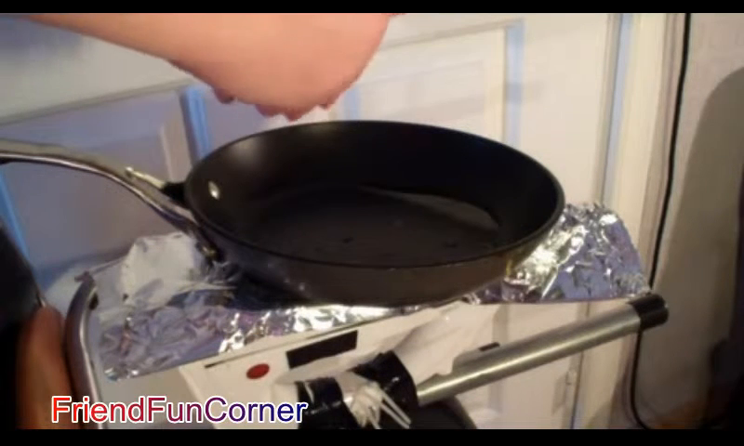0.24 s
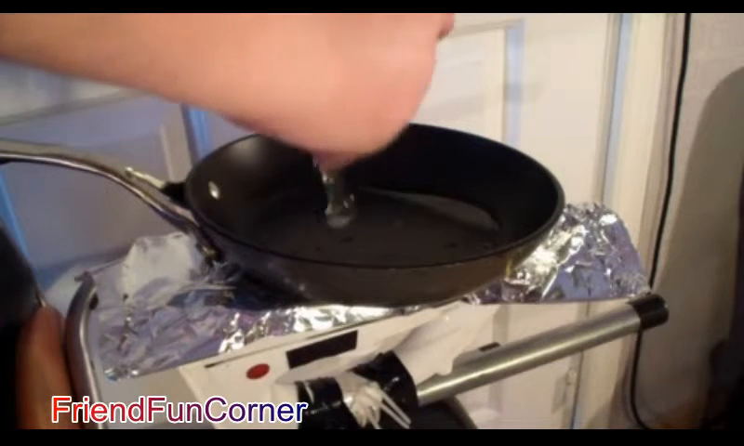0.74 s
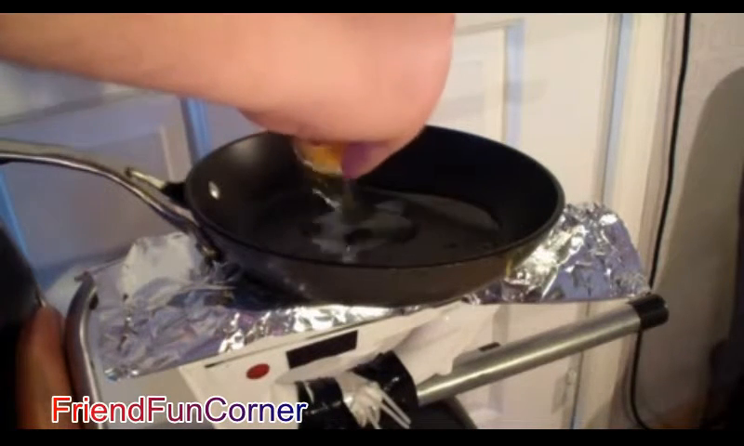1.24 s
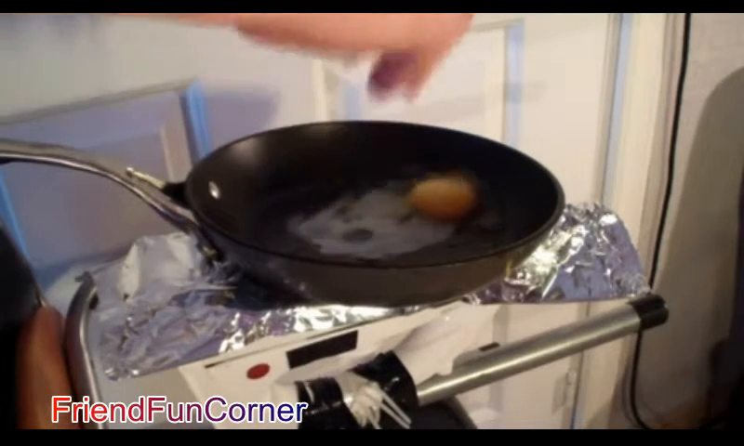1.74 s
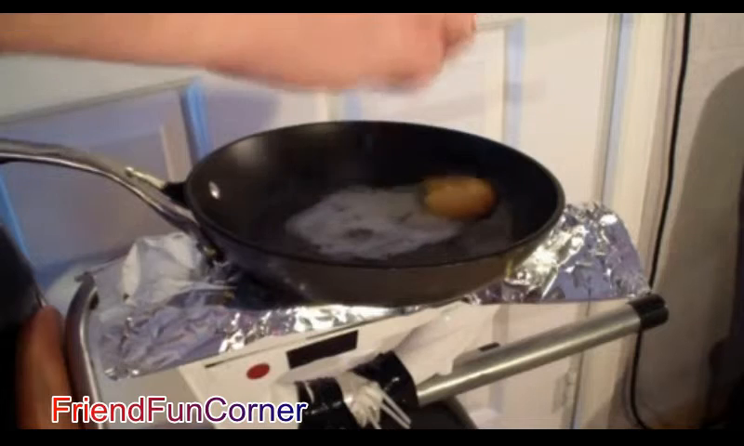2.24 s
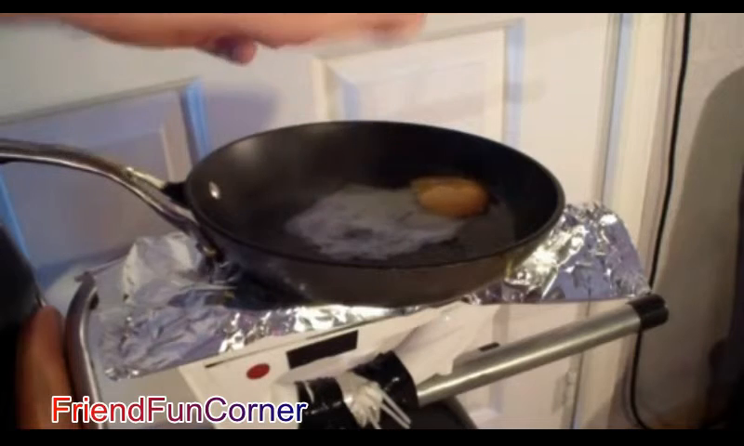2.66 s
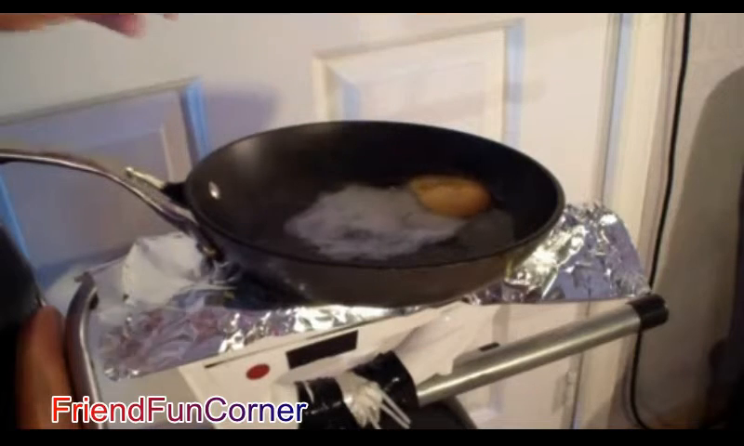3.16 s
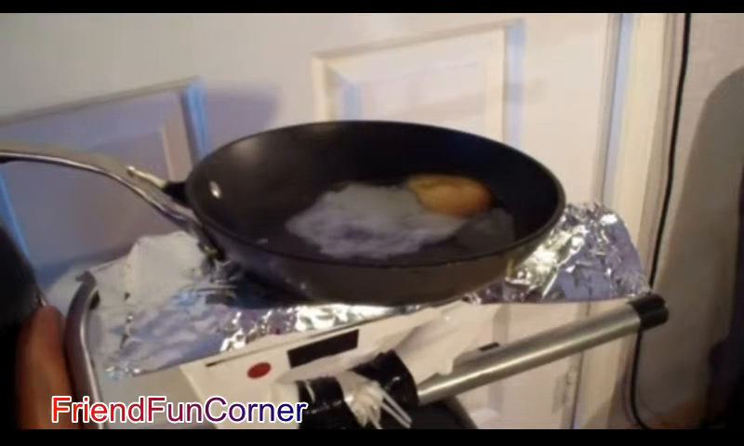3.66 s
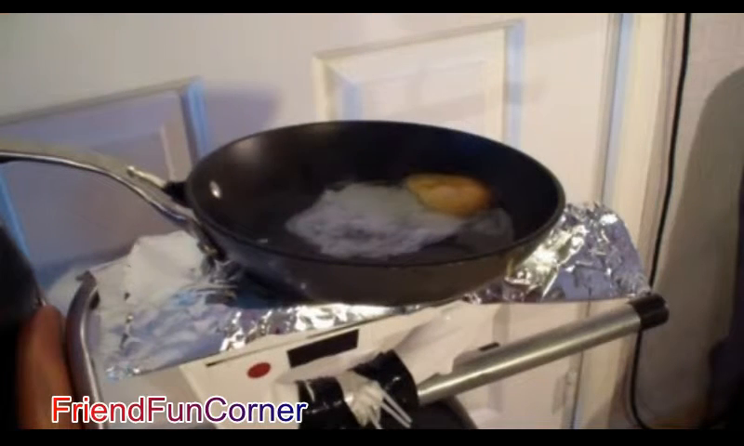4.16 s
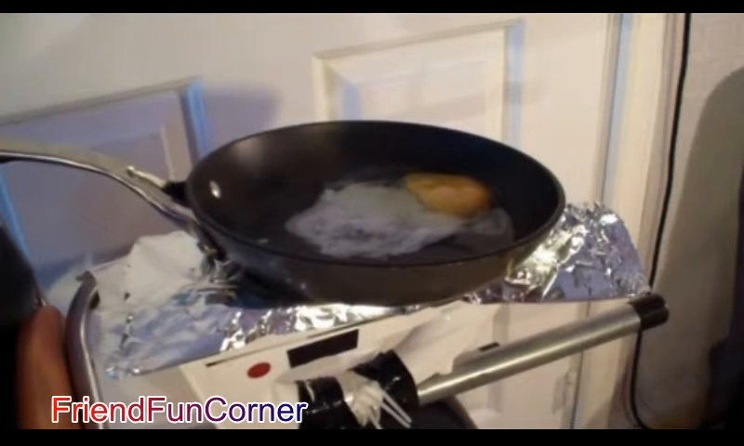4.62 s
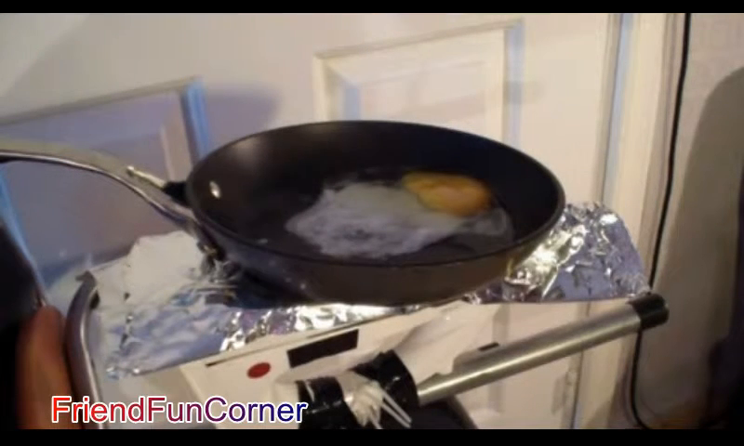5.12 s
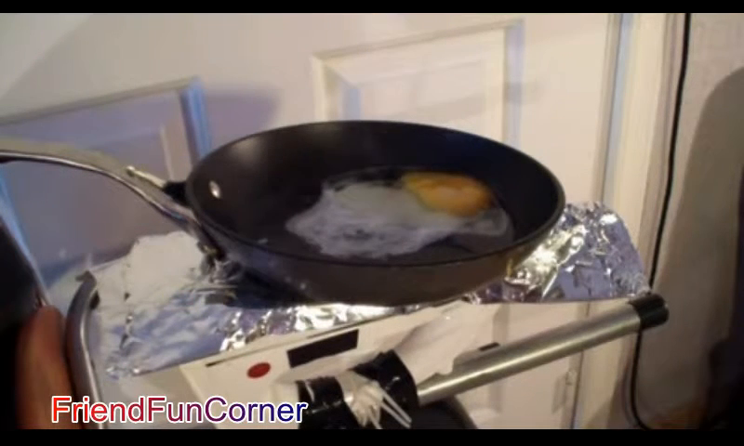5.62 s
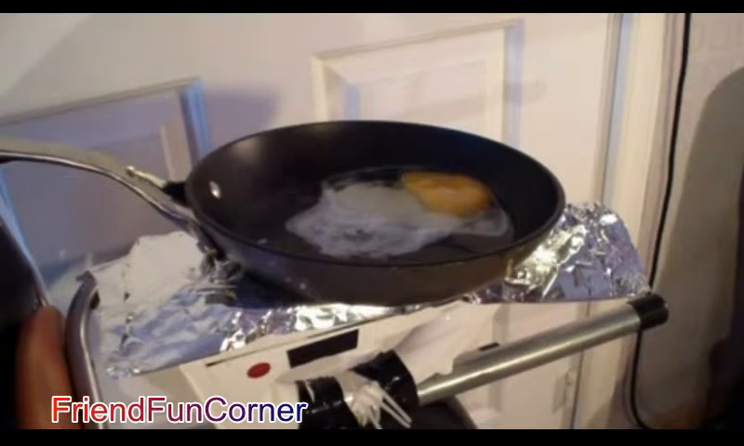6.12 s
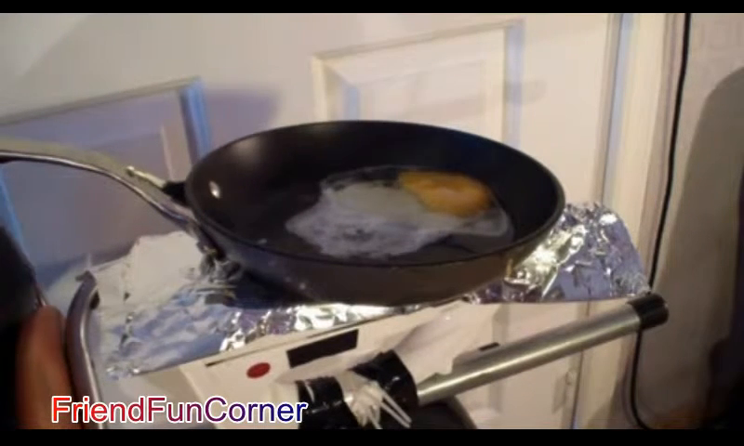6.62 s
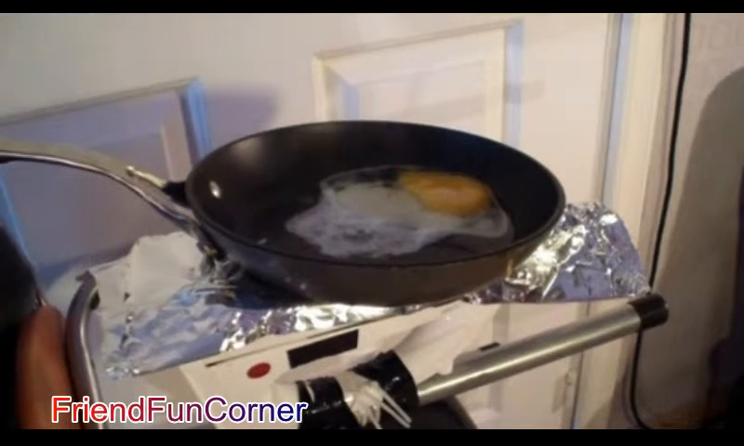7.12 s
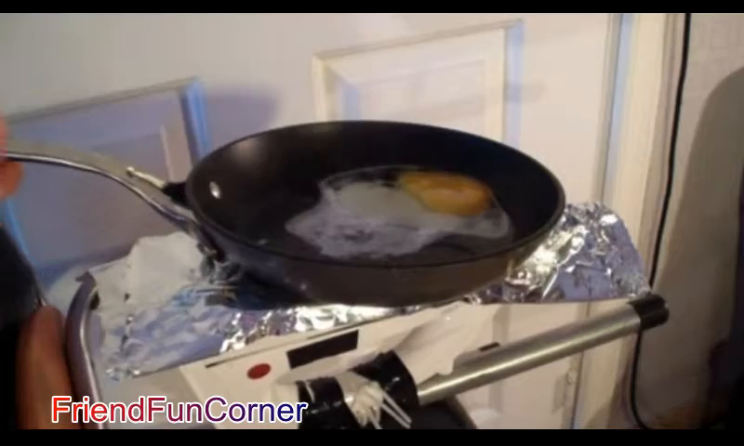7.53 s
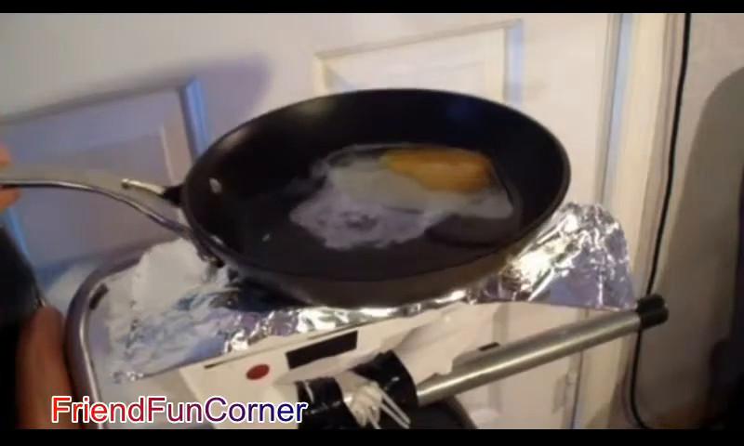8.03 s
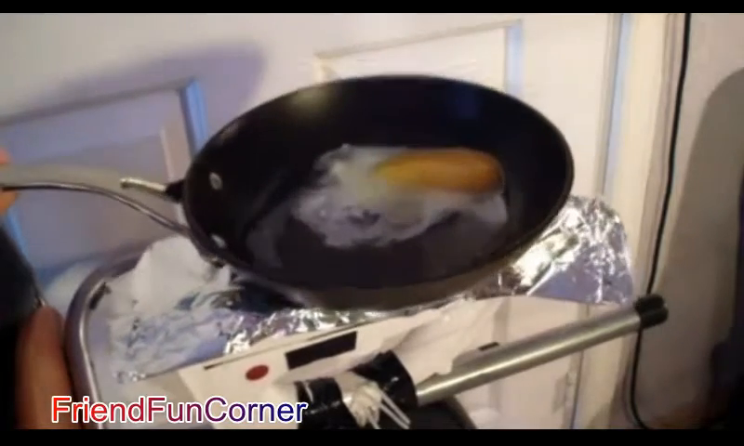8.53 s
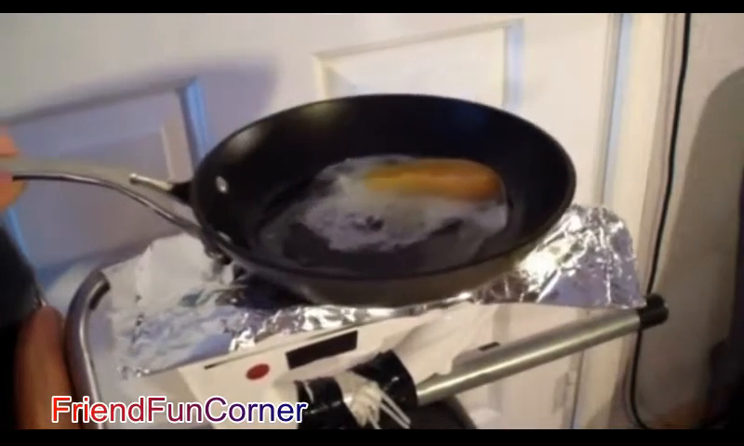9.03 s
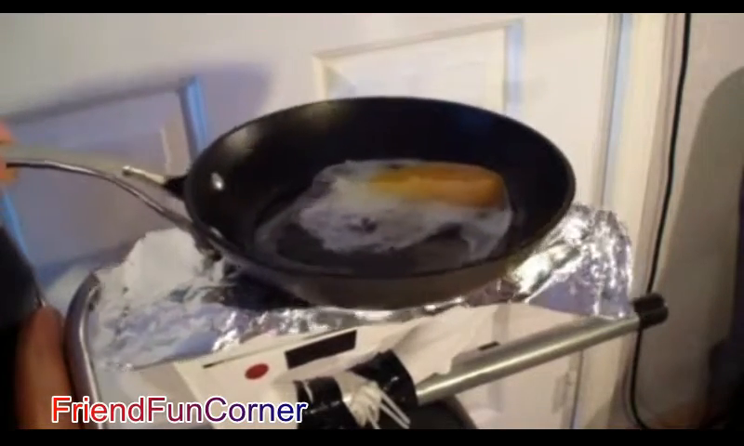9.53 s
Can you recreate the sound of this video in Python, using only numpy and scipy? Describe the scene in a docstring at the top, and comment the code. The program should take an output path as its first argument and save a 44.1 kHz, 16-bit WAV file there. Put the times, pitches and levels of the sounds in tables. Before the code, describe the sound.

Crunchy egg crack, wet plops and a short crackling sizzle that calms, followed by a light tap, a bumped sliding drawer and rustling foil.

```python
"""Frying an egg, close up in a kitchen

Close to the microphone an egg shell cracks (noise bursts and short modes); the egg bubbles and spits in a hot pan
(damped sines and bursts over a noise fizz), then calms. A cup is tapped (short tones); something like a drawer
is bumped, clicks twice and slides (resonant noise); the pan is tilted over crinkling foil (clumped noise).
A fan-like hiss with thin whines stays beneath; outside an engine idles and pulls away, then another (low tones).
"""
import sys
import numpy as np
from scipy import signal
from scipy.fft import rfft, irfft, next_fast_len
from scipy.io import wavfile
from scipy.ndimage import map_coordinates

SR = 44100
rng = np.random.default_rng(int(sys.argv[2]) if len(sys.argv) > 2 else 0)


def inscribe(sig):
    """Save sig as 16-bit PCM at rate SR to the path in sys.argv[1].

    A 1-D sig is mono; a 2-D sig holds one channel per row.
    Samples are clipped to [-1, 1] before scaling.
    """
    pcm = np.round(np.clip(np.atleast_2d(sig).T, -1, 1) * 32767)
    wavfile.write(sys.argv[1], SR, pcm.astype(np.int16))


N = 430857

# course of the frying: (time [s], relative bubbling level [dB], relative fizz level [dB])
FRYING_COURSE = [(1.1, -69, -74), (1.25, -67, -56.5), (1.35, -56, -56), (1.5, -40, -52), (1.65, -34.5, -54),
                 (1.87, -29.5, -49.5), (2.2, -37, -53.5), (2.7, -41.5, -57), (3.03, -46, -58),
                 (3.75, -50, -60), (3.9, -56, -65), (4.6, -76, -63.5)]
# spectrum of foil, click snaps and tap noise: (frequency [Hz], relative density [dB])
RUSTLE_SPECTRUM = [(240, -34), (400, -1.5), (562, -12), (865, 1), (1330, -1), (1560, 2.5), (1760, -2),
                   (2930, 4.5), (4310, -3.5), (5270, 1.5), (6240, -6), (7510, 2.5), (8370, -6),
                   (13500, -11), (16000, -23)]


def amp(db):
    """Gain of a level in dB."""
    return 10 ** (np.asarray(db) / 20)


def unit(x):
    """x at rms 1."""
    return x / np.sqrt(np.mean(x ** 2) + 1e-20)


def along(points, hz):
    """(Hz, value) points read on a log frequency axis."""
    f, v = np.transpose(points)
    return np.interp(np.log(hz + 1), np.log(f + 1), v)


def curves(rows, silent=False):
    """One value per sample for each column after the time; -120 dB outside the rows if silent."""
    s, *cols = np.transpose(rows)
    edge = -120 if silent else None
    return [np.interp(np.arange(N) / SR, s, c, edge, edge) for c in cols]


def wobble(rate):
    """A smooth random curve, rate knots a second."""
    knots = rng.standard_normal(int(N * rate / SR) + 4)
    return map_coordinates(knots, [np.arange(N) * rate / SR])


def filtered(x, response):
    """x times a response of frequency."""
    m = next_fast_len(N + SR // 2)
    return irfft(rfft(x, m) * response(np.fft.rfftfreq(m, 1 / SR)), m)[..., :N]


def coloured(x, spectrum):
    """x through a causal minimum-phase filter of the given spectrum, keeping the power of a white input."""
    size = 4096
    level_db = np.maximum(along(spectrum, np.fft.rfftfreq(size, 1 / SR)), -70)
    cepstrum = irfft(np.log(amp(level_db)))
    # folding the cepstrum forward makes the filter causal
    cepstrum[1:size // 2] *= 2
    cepstrum[size // 2 + 1:] = 0
    pulse = irfft(np.exp(rfft(cepstrum)))
    return signal.fftconvolve(x, pulse / np.linalg.norm(pulse))[:N]


def resonances(peaks):
    """The causal response of (Hz, width Hz, dB) resonances, alternating in sign."""
    def response(f):
        total = 0
        for k, (centre, width, db) in enumerate(peaks):
            damping = 1j * f * width
            total = total + (-1) ** k * amp(db) * damping / (centre * centre - f * f + damping)
        return total
    return response


def grit(spiky_db, rate):
    """Noise whose strength flickers at rate knots a second: dense tiny impacts."""
    return unit(rng.standard_normal(N) * amp(spiky_db * wobble(rate)))


def placed(s, waves):
    """Sum of the rows of waves, each starting at its time s."""
    at = np.round(s * SR).astype(int)[:, None] + np.arange(waves.shape[1])
    return np.bincount(at.ravel(), waves.ravel(), N + SR)[:N]


def bubbles(s, db, hz, t60, size):
    """Damped sines whose pitch rises a little, as when a bubble opens."""
    t = np.arange(size)[None] / SR
    phase = 2 * np.pi * hz[:, None] * t * (1 + 0.039 * t / t60[:, None])
    onset = 1 - np.exp(-t / 0.00035)
    return placed(s, amp(db[:, None] - 60 * t / t60[:, None]) * onset * np.sin(phase))


def bursts(s, db, t60):
    """White noise that starts sharply and dies away; chance shapes it but leaves its energy alone."""
    t = np.arange(SR // 20)[None] / SR
    shape = amp(db[:, None] - 60 * t / np.abs(t60)[:, None])
    waves = shape * rng.standard_normal((len(s), t.size))
    waves *= np.linalg.norm(shape, axis=1, keepdims=True) / np.linalg.norm(waves, axis=1, keepdims=True)
    return placed(s, waves)


def strokes(s, hold, fade_db_s, db, attack):
    """Gain of gestures that rise, hold and fade, added by power."""
    power, t = np.zeros(N + SR), np.arange(SR) / SR
    for start, keep, fade, level in np.broadcast(s, hold, fade_db_s, db):
        late = np.maximum(t - attack - keep, 0)
        power[round(start * SR):][:SR] += (np.minimum(t / attack, 1) * amp(level - fade * late)) ** 2
    return np.sqrt(power[:N])


def background():
    """Steady hiss, narrow whines, mains hum, lumpy rumble and slow swings of pressure."""
    # (frequency [Hz], relative density [dB])
    rumble_spectrum = [(11, -7), (18, 1), (32, 7), (70, 7), (146, -36), (160, -8), (210, -40), (350, -120)]
    hiss_spectrum = [(53, -11), (90, 1), (429, -6.5), (1110, -4), (1540, -2), (1750, -9.5), (2380, -11),
                     (3430, -4), (4260, -13.5), (4750, -9), (6720, -18.5), (7330, -12), (8720, -19),
                     (14700, -22.5), (16000, -24)]
    # whines: (frequency [Hz], half width [Hz], level [dB rms])
    whine_lines = [(1540, 40, -65.5), (3544, 22, -67), (3984, 43, -68.5), (4680, 11, -65.5),
                   (7680, 10, -74), (15650, 3, -99)]
    # swells of the slow pressure swings: (time [s], hold [s], level [dB])
    sway_swells = [(4.225, 0.36, -45.5), (6.69, 0.073, -41)]
    # mains hum before its random wobble: (time [s], level [dB])
    mains_levels = [(0, -64), (4, -62.5), (4.4, -87), (5.2, -57.5), (6.2, -69), (9.77, -77)]

    rumble = amp(-59.0) * unit(coloured(grit(0.33, rate=5), rumble_spectrum))
    s, hold, db = np.transpose(sway_swells)
    sway_gain = amp(-62) + strokes(s, hold, 56, db, attack=0.14)
    sway = sway_gain * unit(wobble(25))  # below hearing pitch

    hiss = amp(-51.5) * coloured(grit(1.0, rate=16), hiss_spectrum)
    treble = filtered(hiss, lambda f: 1 / (1 + (5000 / (f + 1)) ** 6))
    hiss += treble * (amp(2.3 * wobble(13) - 0.73) - 1)  # the treble flickers on its own

    def line(f, hz, width):  # passes white noise at rms 1
        return np.sqrt(SR / np.pi / width) / (1 + ((f - hz) / width) ** 2)

    whines = filtered(rng.standard_normal(N),
                      lambda f: sum(amp(db) * line(f, hz, width) for hz, width, db in whine_lines))
    mains_gain = amp(curves(mains_levels)[0] + 1.8 * wobble(5.2))
    mains = mains_gain * np.sin(2 * np.pi * 120.5 * np.arange(N) / SR)
    return rumble + sway + hiss + whines + mains


def engines():
    """A low note at the firing rate, which climbs from idle ever more slowly as the engine pulls away."""
    # (pulls away at [s], firing rate gained [Hz], time constant of the gain [s])
    pulls = [(4.949, 33.94, 0.39), (8.78, 25.8, 0.77)]
    # one list per engine, before the random wobble: (time [s], level [dB rms])
    engine_levels = [
        [(0, -64), (3.2, -54), (4.85, -49), (5.1, -61), (5.6, -44.5), (5.76, -57), (5.95, -52), (6.25, -68)],
        [(8.85, -69), (9.33, -53.5), (9.51, -68), (9.7, -51), (9.77, -59)],
    ]
    idle_hz = 32

    out, t = 0, np.arange(N) / SR
    for (s, gain_hz, gain_s), level in zip(pulls, engine_levels):
        hz = idle_hz + gain_hz * (1 - np.exp(-np.maximum(t - s, 0) / gain_s))
        db, = curves(level, silent=True)
        gain = np.sqrt(2) * amp(db + 2.4 * wobble(5.4))
        phase = 2 * np.pi * np.cumsum(hz * (1 + 0.022 * wobble(11.0))) / SR
        out = out + gain * np.sin(phase)
    return out


def foil():
    """The moving pan crumples the foil: clumped bright grains, a faint bed and sudden crumples."""
    # bed from the pan leaning on the foil: (time [s], relative level [dB])
    bed_levels = [(7.66, -58), (7.8, -54.5), (8.6, -52.5), (8.75, -61), (9.2, -66), (9.35, -59),
                  (9.77, -42)]
    # sudden crumples: (time [s], hold [s], relative level [dB])
    crumples = [(7.695, 0.073, -44), (7.794, 0.052, -43), (8.007, 0.0046, -48), (8.272, 0.013, -45),
                (8.664, 0.016, -48), (8.897, .005, -56), (9.062, 0.0074, -54), (9.115, 0.012, -46),
                (9.26, .01, -53), (9.287, 0.0064, -50), (9.429, .005, -50), (9.458, 0.01, -48),
                (9.563, 0.035, -46.5), (9.6, 0.025, -45.5)]

    s, hold, db = np.transpose(crumples)
    bed_gain = amp(curves(bed_levels, silent=True)[0])
    gain = np.hypot(bed_gain, strokes(s, hold, 450, db, attack=0.0052))
    return gain * coloured(grit(2.2, rate=200) * amp(1.06 * wobble(30)), RUSTLE_SPECTRUM)


def bumps():
    """Soft dull thuds of shell, drawer and counter: a puff of noise in one broad resonance."""
    # the cracking shell, the drawer and contacts on the counter: (time [s], relative level [dB], centre [Hz])
    dull_thuds = [(0.362, -37, 640), (0.39, -41, 680), (0.407, -39, 690), (5.928, -44, 668),
                  (6.028, -36.5, 497), (6.044, -46, 540), (6.183, -37.5, 445), (6.197, -39, 533),
                  (6.439, -42, 434), (6.604, -45, 336), (6.833, -29, 230), (9.749, -38.5, 820),
                  (9.757, -36, 520), (9.765, -24.5, 560)]
    t60_s, rise_s = 0.04, 0.0011

    out, t = np.zeros(N + SR), np.arange(SR // 6) / SR
    shape = amp(-60 * t / t60_s) * (1 - np.exp(-t / rise_s))
    for s, db, hz in dull_thuds:
        band = signal.butter(3, [0.58 * hz, 1.42 * hz], "band", fs=SR, output="sos")
        puff = shape * signal.sosfilt(band, rng.standard_normal(t.size))
        out[round(s * SR):][:t.size] += amp(db) * puff * np.linalg.norm(shape) / np.linalg.norm(puff)
    return out[:N]


def jolts():
    """The drawer jolts loose: short pushes knock its wooden resonances."""
    # pushes, before a common gain: (time [s], relative level [dB])
    knocks = [(6.834, -21.5), (6.839, -14), (6.848, -14), (6.855, -15), (6.868, -16), (6.882, -22.5),
              (6.896, -22), (6.912, -28), (6.928, -24.5), (6.935, -29)]
    # wooden resonances: (frequency [Hz], width [Hz], relative level [dB])
    drawer_modes = [(323, 70, -4), (715, 70, 4), (1125, 60, -1), (1400, 150, -11), (2050, 100, -14),
                    (3000, 600, -26)]
    t60_s, gain_db = 0.0063, 21

    s, db = np.transpose(knocks)
    pushes = bursts(s, db + gain_db, 0 * s + t60_s)
    wood = resonances(drawer_modes)
    return filtered(pushes, lambda f: wood(f) / (1 + 1j * f / 3000) ** 3)  # wood passes little treble


def catch_clicks():
    """Hard clicks of a catch: damped modes struck together, with a noisy snap on top."""
    # (time [s], relative levels of low modes [dB], high modes [dB] and the 5 kHz mode [dB])
    blows = [(7.0146, -0.5, -21, -8), (7.018, -28, -27, -22), (7.1273, -15, -10.5, -14),
             (7.1266, -17, -7, -13), (7.1292, -14, -13, -11), (7.1322, -18, -20, -20)]
    # modes of the catch: (starting pitch [Hz], relative level [dB], t60 [s])
    catch_modes = [(112, -59, 0.044), (403, -11.5, 0.017), (1210, 4.5, 0.0051), (2580, -12, 0.017),
                   (3120, 8, 0.0051), (4970, 6, 0.0035), (7250, -4, 0.0068), (8900, -15, 0.0056),
                   (10900, -31, 0.0044)]
    snap_db = -8

    s, low_db, high_db, mid_db = np.transpose(blows)
    out = coloured(bursts(s, np.maximum(high_db, mid_db) + snap_db, 0 * s + 0.005), RUSTLE_SPECTRUM)
    for hz, db, t60 in catch_modes:
        blow_db = low_db if hz < 2800 else mid_db if 4000 < hz < 6000 else high_db
        out = out + bubbles(s, db + blow_db, hz + 0 * s, t60 + 0 * s, size=5000)
    return out


def slide():
    """The rasp of sliding: gritty noise in three bands, in which the body's resonances stand out."""
    # (time [s], hold [s], fade [dB/s], relative levels: dull part [dB], bright part [dB], its treble [dB])
    pushes = [(6.831, 0.0041, 108, -32.5, -60, -65), (6.9, .005, 99, -35.5, -45, -41),
              (7.014, 0.093, 698, -27, -28.5, -33.5), (7.118, 0.16, 128, -33.5, -29.5, -21),
              (7.212, 0.13, 106, -34.5, -36, -49)]
    # (frequency [Hz], relative density [dB])
    dull_spectrum = [(60, -21), (229, -13.5), (324, -4.5), (572, -1), (772, 0), (1150, 1), (1550, -5),
                     (2000, -7), (2800, -33), (5000, -65)]
    bright_spectrum = [(900, -24), (1500, 1), (2000, -2), (2970, -1), (3750, -2.5), (4390, -9),
                       (4900, -7.5), (5600, -14.5), (6570, -25.5), (7900, -25.5), (8500, -33.5),
                       (14000, -63)]
    # resonances of the sliding body: (frequency [Hz], width [Hz], relative level [dB])
    metal_modes = [(158.6, 19, 10.5), (340, 20, 10), (501, 7.9, 4), (640, 7.4, 10), (699, 12, 3.5),
                   (936, 43, 7), (1127, 13, 0), (1324, 27, 11), (2500, 20, 2), (2760, 26, 11),
                   (2900, 370, 3), (3450, 24, 13.5), (4030, 77, -11), (5000, 100, -13), (5100, 79, -16)]
    treble_hz, attack_s = 3720, 0.0036

    metal = resonances(metal_modes)

    def body(f):
        return 1 + 0.86 * metal(f)

    s, hold, fade_db_s, *levels_db = np.transpose(pushes)
    dull_grit = grit(1.0, rate=110) * amp(2.6 * wobble(500))
    dull = unit(filtered(coloured(dull_grit, dull_spectrum), body))
    bright_grit = grit(0.94, rate=94) * amp(1.1 * wobble(650))
    bright = unit(filtered(coloured(bright_grit, bright_spectrum), body))
    treble = filtered(bright, lambda f: 1 / (1 + (treble_hz / (f + 1)) ** 10))
    parts = dull, bright - treble, treble
    return sum(strokes(s, hold, fade_db_s, db, attack_s) * part for db, part in zip(levels_db, parts))


def ring():
    """Held at the tap, the cup's tones die at once; then it hums in a few swells, the upper tones dying first."""
    # the cup's resonances: (frequency [Hz], width [Hz], relative level [dB])
    cup_modes = [(1667, 180, 4), (2310, 120, -15), (2690, 60, -5.5), (5460, 210, -15)]
    # taps on the cup: (time [s], relative level [dB], t60 [s])
    taps = [(4.714, -20.5, 0.013), (4.717, -33, 0.01), (4.7184, -21.5, 0.011)]
    # swells of the hum; upper tones hold and fade faster: (time [s], hold [s], fade [dB/s], relative level [dB])
    swells = [(4.724, 0.009, 700, -38.5), (4.748, 0.024, 600, -36), (4.785, .012, 260, -46)]
    pure = 0.6  # share of the lowest hum's power that is a clean tone
    upper_fade = 1.7  # the upper resonances fade this much faster

    s, db, t60 = np.transpose(taps)
    tap = coloured(bursts(s, db - 13.5, t60), RUSTLE_SPECTRUM)
    for hz, _, level in cup_modes:
        scattered_hz = hz * (1 + 0.049 * rng.standard_normal(len(s)))
        tap += bubbles(s, db + 0.48 * level, scattered_hz, t60, size=2000)

    noise = rng.standard_normal(N)
    low = filtered(noise, resonances(cup_modes[:1]))
    upper = filtered(noise, resonances(cup_modes[1:]))
    tone_hz = cup_modes[0][0] * (1 + 0.0065 * wobble(40))
    tone = np.sqrt(2) * np.sin(2 * np.pi * np.cumsum(tone_hz) / SR)
    scale = np.std(low)
    low = np.sqrt(pure) * scale * tone + np.sqrt(1 - pure) * low
    s, hold, fade_db_s, db = np.transpose(swells)
    hum = strokes(s, hold, fade_db_s, db, attack=0.0039) * low
    hum += strokes(s, hold / upper_fade, fade_db_s * upper_fade, db, attack=0.008) * upper
    return tap + hum / scale


def cracks_and_ticks():
    """Each crack or tick is a short burst with a bright edge and a duller body; the shell also rings briefly."""
    # sharp cracks and ticks of shell, first drips, cup, drawer and foil:
    # (time [s], relative levels of bright edge [dB] and body [dB])
    sharp_events = [(0.339, -40, -61), (0.349, -36, -55), (0.3524, -34, -28), (0.355, -32, -25),
                    (0.3575, -29, -23.5), (0.361, -33, -28.5), (0.3664, -31, -33), (0.371, -29, -30),
                    (0.383, -32, -22.5), (0.386, -37, -33), (0.782, -50, -49), (0.9778, -53, -43.5),
                    (1.023, -38, -36), (1.0333, -46, -38), (1.0825, -42, -40), (1.1363, -47, -52),
                    (4.801, -47, -36), (6.0304, -51, -31.5), (6.605, -53, -37), (6.839, -59, -21),
                    (6.908, -41, -26), (7.968, -41, -52), (8.013, -35.5, -46), (8.045, -41, -61),
                    (8.083, -50, -60), (8.203, -46, -60), (8.268, -34, -57), (8.3227, -40, -39),
                    (8.6495, -41, -52), (8.686, -41, -58), (8.9058, -39.5, -57), (9.063, -41, -57),
                    (9.1214, -33.5, -58), (9.1314, -36, -60), (9.164, -40, -62), (9.292, -44, -55),
                    (9.331, -46, -60), (9.4, -38.5, -44), (9.431, -35, -60), (9.461, -43, -64),
                    (9.499, -41, -46)]
    # (frequency [Hz], relative density [dB])
    edge_spectrum = [(1470, -30), (2500, -0.5), (2970, 3.5), (3830, 0), (4760, 2), (6200, -6), (7650, 0.5),
                     (8600, -11), (9360, -1.5), (13100, -11), (16000, -23)]
    body_spectrum = [(120, -9), (200, 0), (401, -10.5), (588, 4), (1040, 4), (1610, -2), (2660, -4.5),
                     (3500, -16.5), (4550, -74), (7700, -120)]
    # modes of the egg shell: (starting pitch [Hz], t60 [s])
    shell_modes = [(1080, 0.01), (2500, 0.0083)]
    # fractures that ring the shell: (time [s], low mode level [dB], high mode level [dB])
    fractures = [(0.352, -24, -34), (0.354, -24, -36), (0.358, -21, -36), (0.361, -30, -40),
                 (0.3663, -45, -23), (.371, -40, -22), (0.3826, -26, -32)]
    edge_t60_s, body_t60_s = 0.016, 0.0072

    s, edge_db, body_db = np.transpose(sharp_events)
    edge = bursts(s, edge_db, 0 * s + edge_t60_s)
    body = bursts(s, body_db, 0 * s + body_t60_s)
    s, *levels_db = np.transpose(fractures)
    shell = sum(bubbles(s, db, hz + 0 * s, t60 + 0 * s, size=1500)
                for db, (hz, t60) in zip(levels_db, shell_modes))
    return shell + coloured(edge, edge_spectrum) + coloured(body, body_spectrum)


def fizz():
    """Frying fizz: flickering noise, tiny spits and bursting droplets share one spectrum."""
    # (frequency [Hz], relative density [dB])
    fizz_spectrum = [(530, -51.5), (900, 9.5), (1340, 12), (1550, -1.5), (1830, -2.5), (1990, -10),
                     (2420, -2), (4010, -3.5), (5410, 2), (6110, -5.5), (7770, 4.5), (8450, -14),
                     (9420, 0.5), (14400, -11), (16000, -35)]
    spit_db, droplet_db = -8, -1  # against the smooth fizz

    when, strength = rng.random((2, 520))
    tiny_spits = unit(bursts(when * 2.9 + 1.6, -2.8 * np.log(strength + 0.03), 0.003 + 0.001 * strength))
    when, pitch, strength = rng.random((3, 9000))
    hz = 2000 * 5 ** pitch
    droplets = unit(bubbles(when * 3.5 + 1.1, -2.6 * np.log(strength + 0.01), hz, 14 / hz, size=200))
    smooth = grit(0.6, rate=170) * amp(0.45 * wobble(41.2))
    out = coloured(amp(droplet_db) * droplets + smooth + amp(spit_db) * tiny_spits, fizz_spectrum)
    # until the white sets, between 1.8 and 2.2 s, the fizz gathers near 5.4 kHz and is duller on top
    wet = np.interp(np.arange(N) / SR, [1.8, 2.2], [1, 0])
    out += wet * filtered(out, lambda f: 0.6 / (1 + ((f - 5400) / 500) ** 2)
                          - 0.3 / (1 + (8800 / (f + 1)) ** 10))
    return amp(curves(FRYING_COURSE, silent=True)[1]) * out


def bubbling():
    """Water under the egg boils: short steam bubbles, damped sines that thin out and deepen."""
    # resonances of the pan: (frequency [Hz], width [Hz], relative level [dB])
    pan_modes = [(580, 62, -7.5), (1260, 83, -20), (1740, 75, -3), (2550, 300, 5), (3540, 670, -4)]
    first_hz, last_hz, deepen_s = 2250, 498, 0.69  # lowest pitch sinks as the white sets, time constant
    spread = 3.32  # highest pitch over lowest

    times, bubbling_db, _ = np.transpose(FRYING_COURSE)
    when, pitch, strength, life = rng.random((4, 2600))
    s = 1.15 + 3.4 * when ** 2.2  # boiling is densest just after the egg lands
    lowest_hz = last_hz + (first_hz - last_hz) * np.exp(-(s - times[0]) / deepen_s)
    hz = lowest_hz * spread ** pitch
    crowding_db = 4 * np.log10(when + 0.028)  # fewer bubbles, each larger
    size_db = -(1.97 + 2.24 * when) * np.log(strength + 0.012)  # sizes scatter more as the boiling thins
    db = np.interp(s, times, bubbling_db) + crowding_db + size_db
    swarm = bubbles(s, db, hz, (6 + 11 * life) / hz, size=900)
    pan = resonances(pan_modes)
    return filtered(swarm, lambda f: 0.5 + pan(f))  # the pan favours some pitches


def drips_and_plops():
    """First drips of white, then steam bubbles that stand out: damped sines, each with a higher neighbour."""
    # (time [s], level [dB], starting pitch [Hz])
    drops = [(0.782, -37, 2100), (0.798, -42, 1980), (0.814, -41, 1820), (0.826, -42, 1740),
             (0.836, -36.5, 1690), (0.896, -42, 1650), (0.946, -39, 1020), (0.954, -39, 1030),
             (1.026, -30.5, 1140), (1.033, -29, 1070), (1.083, -33, 1200), (1.136, -35.5, 1090),
             (1.17, -49, 1200), (1.21, -43, 1300), (1.245, -40, 1230), (1.261, -41, 1180),
             (1.276, -49, 1290), (1.589, -39, 1260), (1.686, -33, 1260), (1.712, -31, 1760),
             (1.724, -31, 1750), (1.777, -33, 2460), (1.853, -29, 1310), (1.874, -31, 1750),
             (1.882, -28, 1340), (1.906, -29, 1770), (1.942, -26.5, 1230), (2.088, -42, 1250),
             (2.171, -29.5, 1680), (2.255, -42, 1060), (2.274, -41, 1610), (2.311, -33, 1190),
             (2.346, -30, 1180), (2.415, -29.5, 1180), (2.447, -35, 1010), (2.51, -28.5, 1250),
             (2.53, -34, 1210), (2.638, -36, 1440), (2.678, -34, 1130), (2.715, -36, 1310),
             (2.741, -31.5, 1170), (2.892, -38, 1020), (2.935, -35, 1010), (2.961, -36, 1370),
             (2.989, -34, 1190), (3.013, -35, 1660), (3.16, -25.5, 1625), (3.252, -34, 1200),
             (3.287, -30.5, 1010), (3.377, -34.5, 1500), (3.715, -34, 620), (3.755, -36, 970),
             (3.767, -34, 1150), (4.173, -39, 576), (4.577, -35.5, 594), (4.661, -31, 1440)]
    plop_t60_s, drip_t60_s, neighbour_db = 0.019, 0.029, -8.5

    s, db, hz = np.transpose(drops)
    t60 = np.where(s < FRYING_COURSE[2][0], drip_t60_s, plop_t60_s)  # the first drips of white ring longer
    neighbour_hz = hz * (1.21 + 0.39 * rng.random(len(s)))
    neighbours = bubbles(s, db + neighbour_db, neighbour_hz, t60, size=2000)
    return bubbles(s, db, hz, t60, size=2000) + neighbours


def fat_spits():
    """Fat spitting: sharp noise bursts, each with its own balance of middle and treble."""
    # (time [s], relative level [dB], treble up and middle down by [dB])
    spit_events = [(1.4444, -36, -6), (1.4994, -33, -3), (1.938, -43, -5), (2.1038, -20.5, -4.5),
                   (2.1122, -28, -1), (2.1822, -23.5, 1), (2.2258, -27, -2), (2.3444, -43, -4),
                   (2.4084, -29, 0.1), (2.4236, -31, -3), (2.4374, -29, 1), (2.4543, -28.5, 1),
                   (2.5094, -39, 4), (2.5324, -46, 3), (2.5722, -25, -2), (2.639, -33, -3),
                   (2.7133, -33.5, 5), (2.759, -38, 3), (2.9351, -24.5, -2), (2.959, -46, 1),
                   (3.0116, -35, -1), (3.051, -28, -2.5), (3.0949, -34, -4), (3.1597, -26, -4),
                   (3.2884, -39, 2), (3.842, -43, -3), (4.019, -36, -3), (4.2593, -35, 3), (4.565, -33, -4),
                   (5.1098, -40, 5)]
    # (frequency [Hz], relative density [dB])
    spit_spectrum = [(500, -19), (1500, -3), (2600, -1.5), (4000, 4), (5400, 5), (6200, -3.5), (7600, 3.5),
                     (8600, -7), (11000, -3), (16000, -18)]
    gain_db, t60_s = -1.5, 0.005

    s, db, bright_db = np.transpose(spit_events)
    low = coloured(bursts(s, db + gain_db - bright_db, 0 * s + t60_s), spit_spectrum)
    high = coloured(bursts(s, db + gain_db + bright_db, 0 * s + t60_s), spit_spectrum)
    return high + filtered(low - high, lambda f: 1 / (1 + (f / 4600) ** 8))  # they cross at 4.6 kHz


def kitchen(x):
    """The room's answer: a noise tail, 200 samples late, in which each frequency dies at its own speed."""
    # (frequency [Hz], t60 [s])
    room_t60 = [(300, 0.45), (2000, 0.37), (10000, 0.17)]

    hz, t, z = signal.stft(rng.standard_normal(SR // 2), SR, nperseg=256)
    fade = amp(-60 * t / along(room_t60, hz)[:, None])
    tail = signal.istft(z * fade, SR, nperseg=256)[1]
    return signal.fftconvolve(np.pad(x, (200, 0)), tail / np.linalg.norm(tail))[:N]


def scene():
    """Drips, plops, spits, cracks, ticks, thuds and jolts get the room's tail; the other layers go without it."""
    sizzle = bubbling() + fizz()
    pops = drips_and_plops() + fat_spits()
    snaps, thuds, knocks = cracks_and_ticks(), bumps(), jolts()
    room = kitchen(amp(-11) * (pops + knocks) + amp(-14) * snaps + amp(-5) * thuds)
    near = pops + snaps + knocks + thuds + room + sizzle
    handling = catch_clicks() + slide() + ring() + foil()
    return (near + handling + engines() + background())[None]


def record(dry):
    """The microphone's signal keeps nothing above its band limit of 15.9 kHz."""
    return filtered(dry, lambda hz: hz < 15900)


dry = scene()
out = record(dry)
inscribe(out)
```